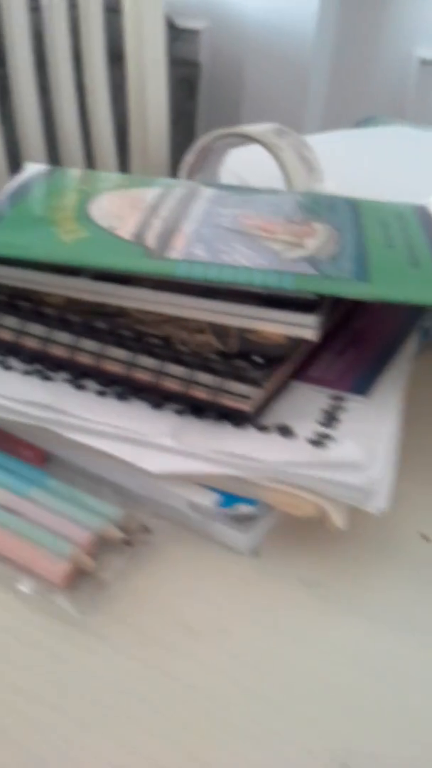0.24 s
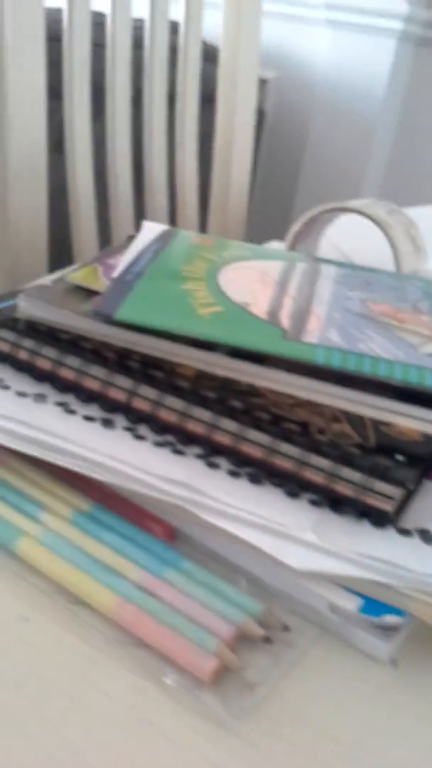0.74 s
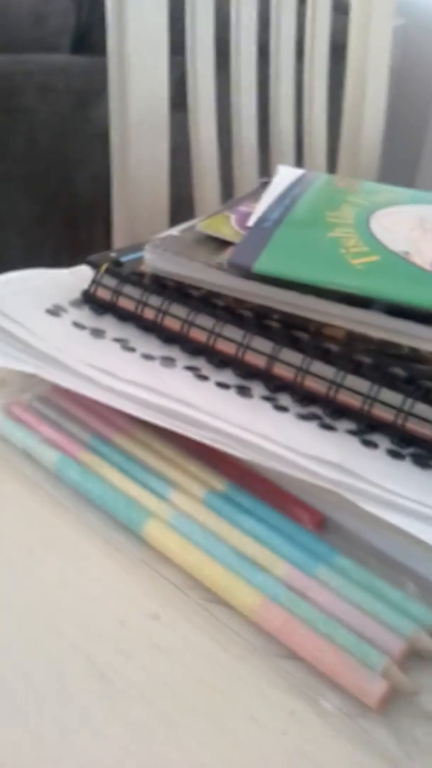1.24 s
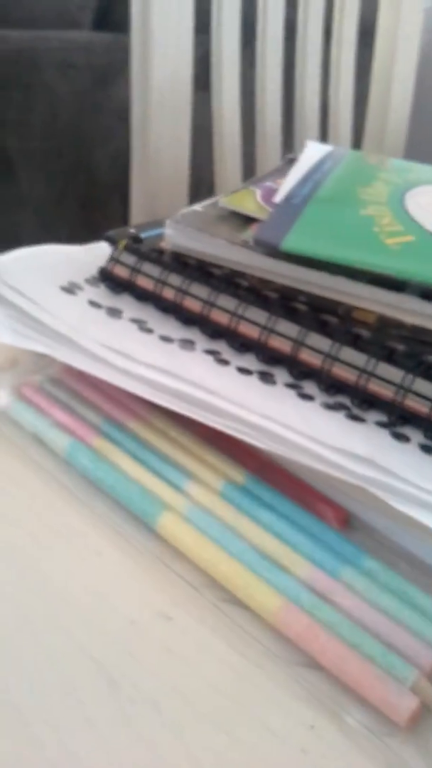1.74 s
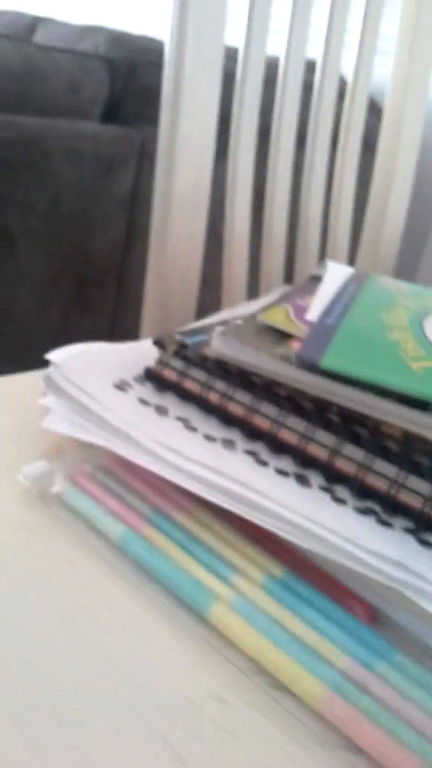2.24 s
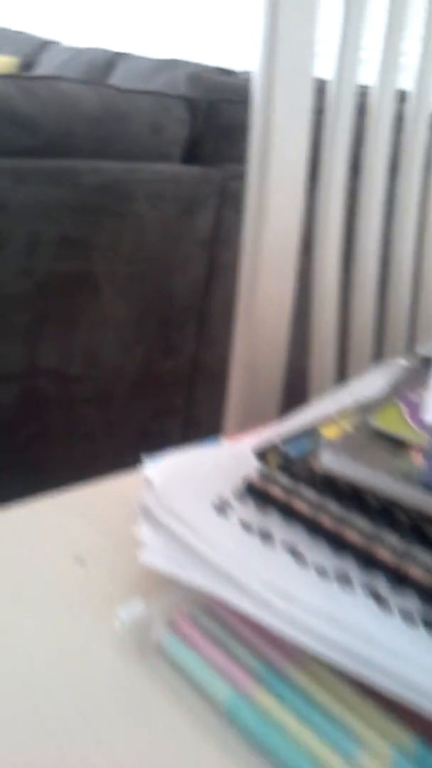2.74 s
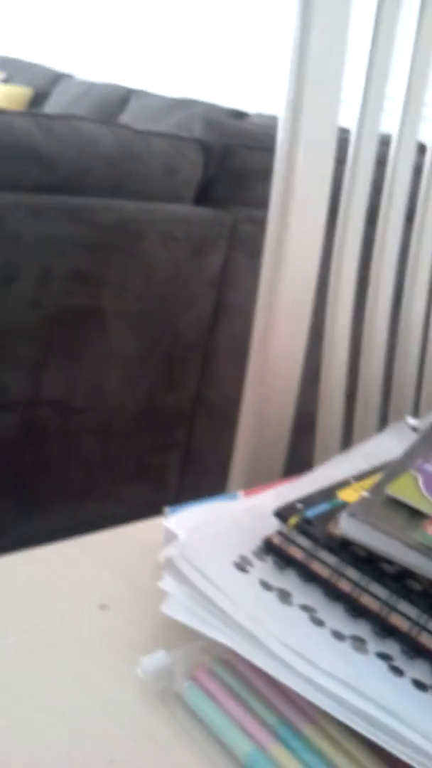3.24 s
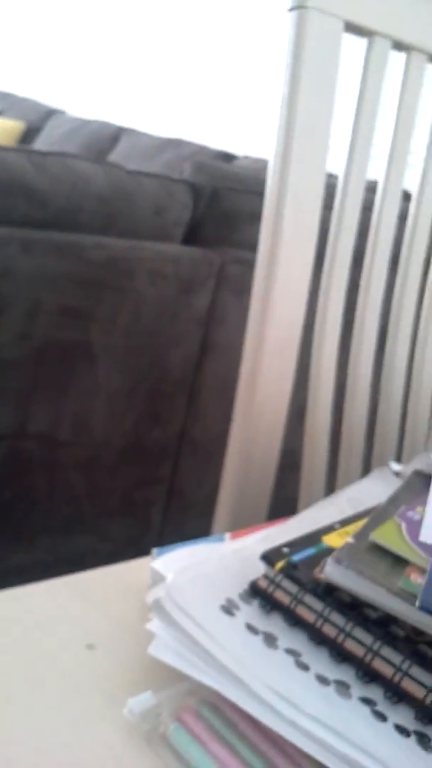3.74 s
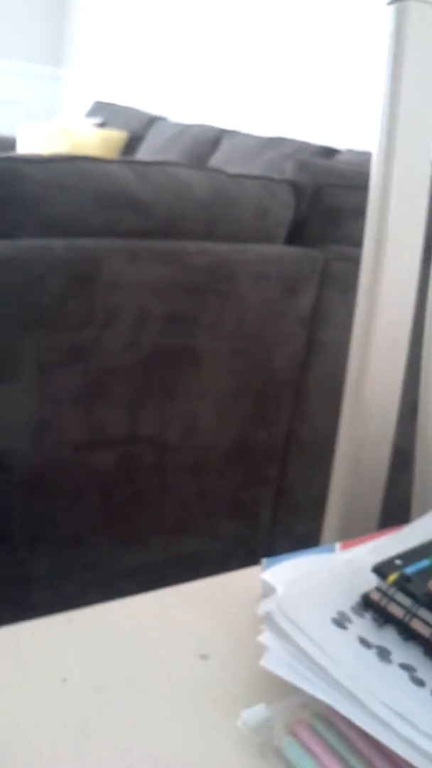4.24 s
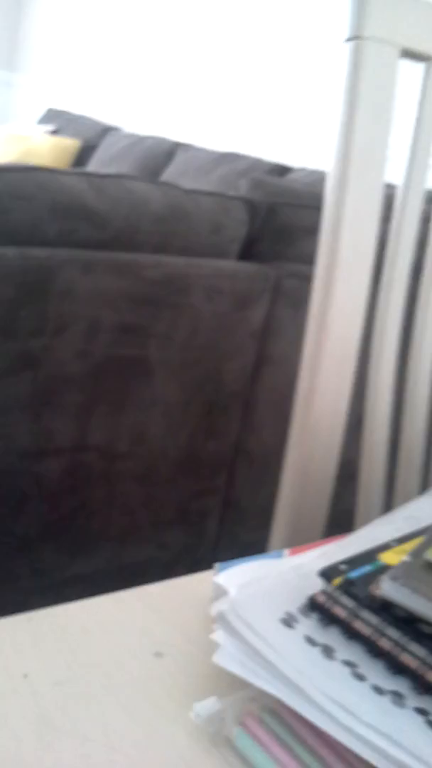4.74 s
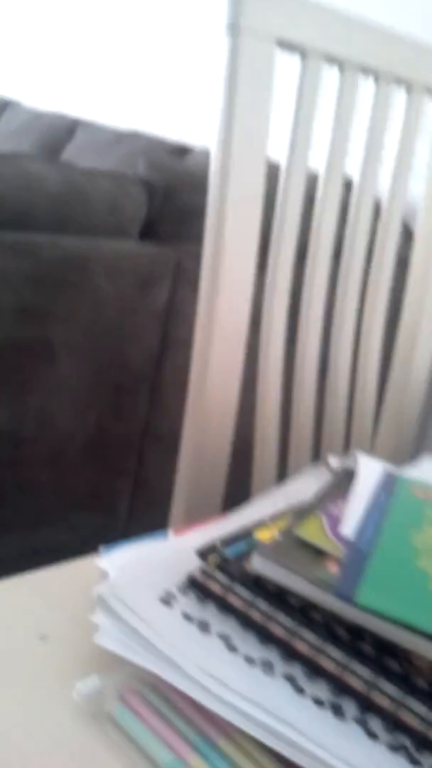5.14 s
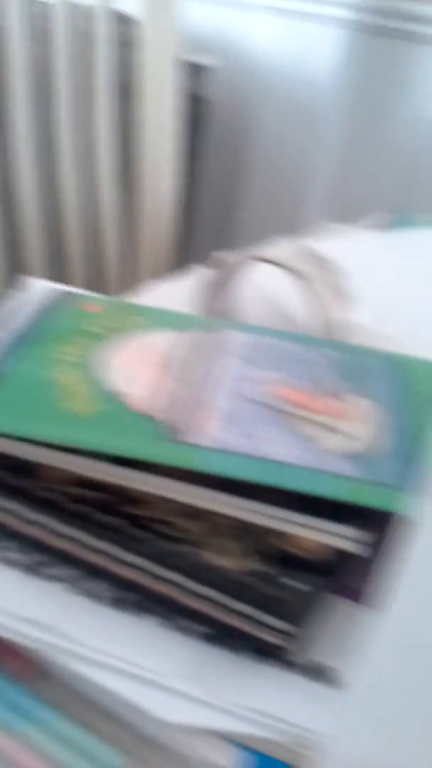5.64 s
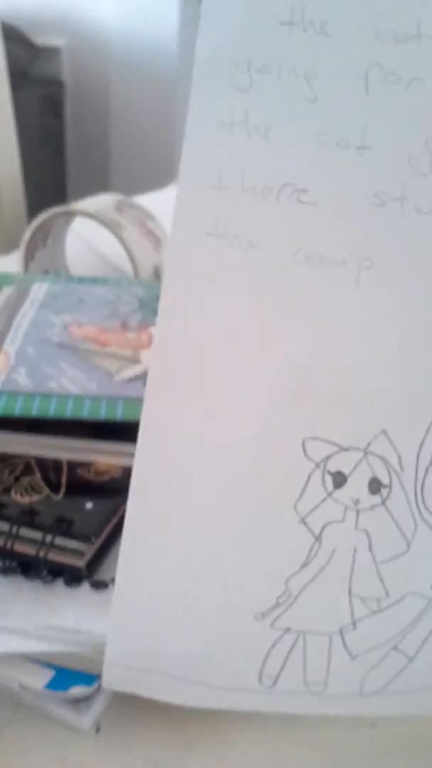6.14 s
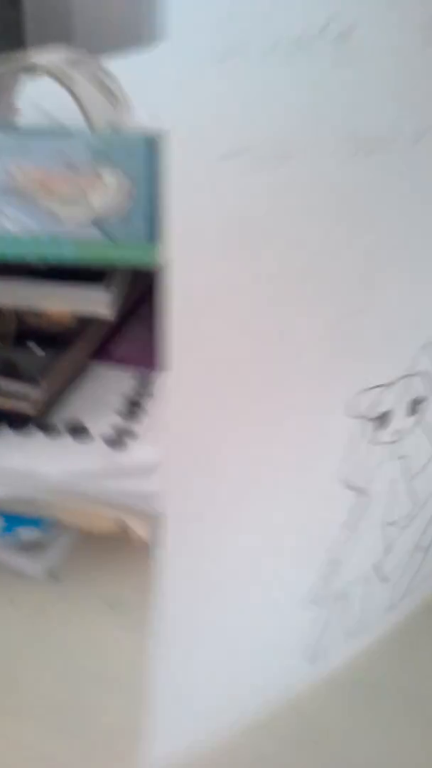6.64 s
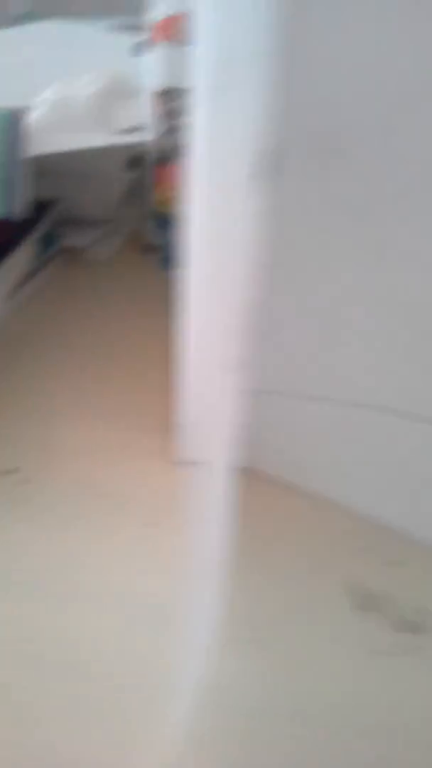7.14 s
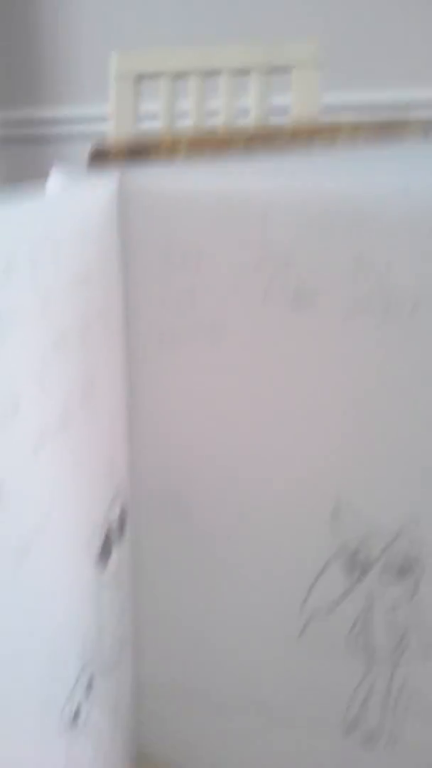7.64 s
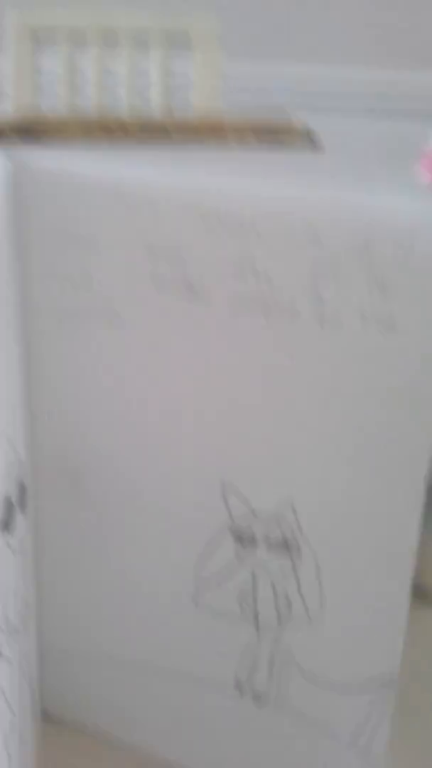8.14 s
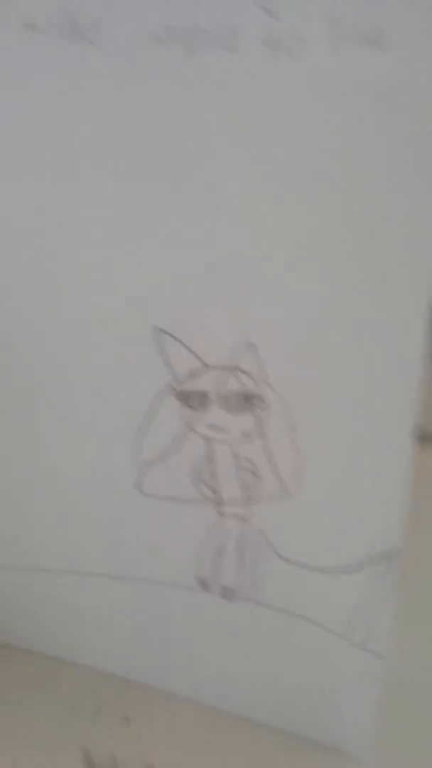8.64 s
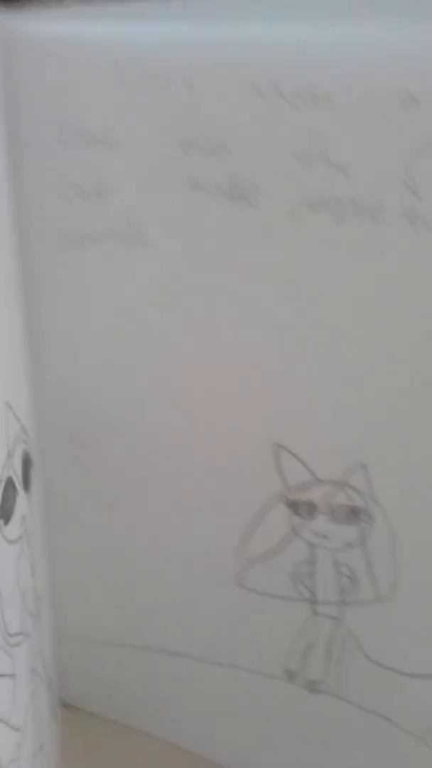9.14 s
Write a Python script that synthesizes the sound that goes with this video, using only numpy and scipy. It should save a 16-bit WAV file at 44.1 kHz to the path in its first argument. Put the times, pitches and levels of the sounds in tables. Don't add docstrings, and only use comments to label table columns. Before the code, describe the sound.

A quiet small room with low rumble and faint hiss, recorded very close on a phone in stereo. A sheet is already sliding at 0 s and fades; soft edge knocks come from 0.3 to 1.1, with a crisp rub and crease snaps near 0.9. At 1.7 a stiff corner cracks sharply on the left over a thump. A pad drops at 2.7, bouncing within a tenth of a second, followed by three tiny flaps and a brief faint squeak at 3.1. Light creases tick until 4.5, then a hollow rub with knocks to 4.8, taps at 4.9, a flat slap at 5.2, and a strong rustle at 5.5. A very faint creak at 5.7, a knock and rustle at 6.3, then flutter. Small ticks at 7; bright swishes from 7.7 to 8.1; dense, loud crumpling at 8.2-8.4. Quiet rustles and a firm low tap close around 9.1-9.2.

```python
import sys
import numpy as np
from scipy import signal
from scipy.fft import rfft, irfft, next_fast_len
from scipy.io import wavfile
from scipy.ndimage import uniform_filter1d, map_coordinates

SR = 44100
rng = np.random.default_rng(int(sys.argv[2]) if len(sys.argv) > 2 else 0)


def magnitude_from_level(level_db):
    exponent = np.asarray(level_db, float) / 20
    return 10 ** exponent


def log_audio(samples):
    frames = np.atleast_2d(samples).T
    limited = np.clip(frames, -1, 1)
    pcm = np.round(limited * 32767).astype(np.int16)
    wavfile.write(sys.argv[1], SR, pcm)


N = 414540


def unit(x):
    return x / np.sqrt(np.mean(x ** 2) + 1e-20)


def along(points, hz):
    f, v = np.transpose(points)
    return np.interp(np.log(hz + 1), np.log(f + 1), v)


def curves(rows):
    s, *columns = np.transpose(rows)
    return [np.interp(np.arange(N) / SR, s, column) for column in columns]


def wobble(rate):
    knots = rng.standard_normal(int(N * rate / SR) + 4)
    return map_coordinates(knots, [np.arange(N) * rate / SR])


def filtered(x, response):
    m = next_fast_len(N + SR // 2)
    return irfft(rfft(x, m) * response(np.fft.rfftfreq(m, 1 / SR)), m)[..., :N]


def resonances(modes):
    def response(f):
        total = 0
        for k, (centre, width, db) in enumerate(modes):
            ring = 1j * f * width / (centre * centre - f * f + 1j * f * width)
            total = total + (-1) ** k * magnitude_from_level(db) * ring
        return total
    return response


def coloured(spectrum):
    return lambda hz: magnitude_from_level(along(spectrum, hz))


def sides(db):
    return magnitude_from_level(np.array([db / 2, -db / 2]))


def blend(pair, alike):
    def mix(hz):
        turn = np.arccos(np.clip(along(alike, hz), -1, 1)) / 2
        return np.array([np.cos(turn), np.sin(turn)])
    mid, side = filtered(pair, mix)
    return np.array([mid + side, mid - side])


def grain(rough_db, rate, patchy_db, crackle=0):
    z = signal.stft(rng.standard_normal((2, N)), nperseg=256)[2]
    field = uniform_filter1d(rng.standard_normal(z.shape[1:]), 5, 0)
    field = uniform_filter1d(field, 10, 1)
    pair = signal.istft(z * magnitude_from_level(patchy_db * unit(field)), nperseg=256)[1][:, :N]
    pop_sizes = (rng.random(N) < 250 / SR) * rng.uniform(.5, 1, N)
    pops = pop_sizes * rng.standard_normal((2, N))
    return pair * magnitude_from_level(rough_db * wobble(rate)) + crackle * pops


def bursts(rows, alike, spread, top_hz, order, boost_db, size=SR // 32):
    out, t = np.zeros((2, N + SR)), np.arange(size) / SR
    for s, db, pan_db, t60, hz in rows:
        a, b = rng.standard_normal((2, len(t)))
        shape = magnitude_from_level(-60 * t / max(t60, .001)) * (1 - np.exp(-t / 0.00024))
        edges = [hz / spread, min(hz * spread, top_hz)]
        ports = shape * [a, alike * a + np.sqrt(1 - alike ** 2) * b]
        pair = signal.lfilter(*signal.butter(order, edges, "band", fs=SR), ports)
        energy = np.linalg.norm(shape) * np.sqrt((edges[1] - edges[0]) / hz)
        gain = magnitude_from_level(db + boost_db) * energy * sides(pan_db)
        out[:, round(s * SR):][:, :len(t)] += (gain / np.linalg.norm(pair, axis=1))[:, None] * pair
    return out[:, :N]


def soft_edged(x):
    return signal.sosfilt(signal.butter(6, 6800, fs=SR, output="sos"), x)


# (time [s], level [dB])
HUM = [(0.0, -61), (1.65, -55.5), (2.17, -63.5), (3.03, -58), (3.61, -61), (4.92, -58), (7.59, -61.5),
       (8.22, -56), (9.4, -63.5)]
# (frequency [Hz], width [Hz], level [dB])
ROOM_MODES = [(138, 14, -5), (212, 13, -1), (285, 45, -6), (337, 10, 2), (405, 40, -8), (480, 70, -15)]
# (frequency [Hz], level [dB per Hz])
HISS = [(260, -21), (450, -3.5), (543, -6.5), (812, -9), (1020, -10), (3730, -19), (6260, -19),
        (14000, -23)]
# (frequency [Hz], likeness [-1 to 1])
ALIKE = [(60, 0.3955), (180, 1), (550, 0.5), (1650, -0.31), (4970, 0.3), (15000, -0.087)]


def room():
    (db,) = curves(HUM)
    push = blend(rng.standard_normal((2, N)) * magnitude_from_level(1.54 * wobble(11)), ALIKE)
    modes = resonances(ROOM_MODES)
    rumble = filtered(push, lambda f: (modes(f) + 0.16) / (1 + (95 / (f + 1)) ** 5.9) / (1 + (f / 600) ** 4))
    shake = filtered(rng.standard_normal((2, N)), lambda f: 1 / (1 + (f / 24) ** 3))
    hiss = filtered(blend(rng.standard_normal((2, N)), ALIKE), coloured(HISS))
    return magnitude_from_level(db + 1.0) * (unit(rumble) + magnitude_from_level(-17.0) * unit(shake)) + magnitude_from_level(-64.5) * unit(hiss)


# (peak time [s], 20 dB rise [s], 20 dB fall [s], rub level [dB], drag over rub [dB])
PUSHES = [(0.01, -3, 0.7544, -59, -1), (0.72, 0.38, 0.3885, -52, -4.5), (0.912, 0.01, 0.06, -44, -4),
          (0.932, 0.04, 0.25, -44.5, -5), (2.3, 1, 0, -65, -11), (2.705, 0.01, 0.25, -51.5, 13),
          (3.126, .012, 0.18, -50, 0.5), (3.36, 0.94, 0.1, -61, -5), (3.47, .09, .14, -58, -8),
          (3.62, .1, .08, -57.5, -10), (3.775, .03, .07, -60.5, -8), (5.27, 0.3, 0.24, -56.5, -6),
          (5.499, 0.17, 0.14, -39.5, -4), (5.56, 0.46, 0.18, -60, 9.5), (5.86, 0, 0.5, -63, 0.5),
          (5.96, 0.08, 0.0593, -53.5, -4), (6.283, 0.02, -0.01, -46.5, 0), (6.91, 0.03, 0.15, -60.5, 2),
          (3.875, 0.3, 0.5, -63, -2), (7.37, 0.16, 0, -61, -12), (8.379, .07, .006, -37, -20),
          (9.055, .1, .05, -61, -2), (9.11, .05, .15, -64, 1), (9.157, .04, .05, -63, -5),
          (9.207, .05, .04, -55, 0), (9.28, .08, .03, -66, 0), (6.44, 0.13, .08, -59, 0.5),
          (6.27, 0.1, .05, -57, 0), (4.6, .1, -0.2, -52.5, -8), (7.83, 0.03, 0.15, -48.5, -30)]
# (start time [s], length [s], rub level [dB], gain by the end [dB], drag over rub [dB])
GLIDES = [(0.879, 0.013, -45, -1, -8), (1.056, 0.11, -62, 2, -4), (1.221, 0.421, -60, 10, -4.5),
          (1.688, 0.21, -58.5, 3.5, -3.5), (2.772, 0.16, -53, -4, 4), (4.016, 0.016, -51, 0, -4),
          (4.054, 0.11, -60, 4.5, 0), (4.193, 0.35, -62, 6.5, -1.5), (4.605, .15, -43.5, 5.5, -7),
          (4.766, 0.18, -45.5, -8, -2.5), (4.952, 0.17, -58.5, -6.5, -1), (6.302, 0.021, -45.5, 0.5, -8),
          (6.328, .05, -51.5, -3.5, -6), (7.681, 0.083, -42, -3, -23), (7.77, 0.088, -54.5, 1.5, -7.5),
          (7.834, 0.068, -42, 6.5, -31), (7.911, 0.044, -35.5, 5, -43), (7.953, 0.027, -32.5, -1.5, -29),
          (8.041, .01, -50, 4, -18), (8.053, 0.068, -38.5, 1, -23.5), (8.159, 0.07, -60.5, 9.5, -8.5),
          (8.218, 0.079, -47, 5, -15), (8.318, 0.03, -37.5, -4.5, -17), (8.397, 0.1, -51.5, -5.5, -4)]


def strokes():
    grip_s, stop_s = 0.0085, 0.022
    resting_db, resting_drag_db = -71.5, -73
    t = np.arange(0, N, 64) / SR
    shapes = []
    for s, rise, fall, db, over_db in PUSHES:
        away = np.maximum((s - t) / abs(rise), (t - s) / abs(fall))
        shapes.append((db - 20 * away, over_db))
    for s, length, db, gain_db, over_db in GLIDES:
        ends = np.maximum(np.maximum((s - t) / grip_s, (t - s - length) / stop_s), 0)
        shapes.append((db + gain_db * np.clip((t - s) / length, 0, 1) - 20 * ends, over_db))
    still_db = -6 * (t > 9.23)
    rub_power = magnitude_from_level(2 * (resting_db + still_db)) + sum(magnitude_from_level(2 * db) for db, _ in shapes)
    drag_power = magnitude_from_level(2 * resting_drag_db) + sum(magnitude_from_level(2 * (db + over_db)) for db, over_db in shapes)
    rub_db, drag_db = 10 * np.log10(rub_power), 10 * np.log10(drag_power)
    sheen_db = -9 - 0.13 * (rub_db + 60)
    sheen_db = sheen_db + 2 * (t > 7.66)
    sheen_db = sheen_db + 3 * np.exp(-((t - 7.95) / 0.036) ** 2)
    return curves(np.transpose([t, rub_db, drag_db, sheen_db]))


# (frequency [Hz], level [dB per Hz])
RUB = [(880, -57), (1500, -30.5), (2280, -14.5), (2900, -13.5), (3700, -10.5), (5660, 0), (8020, -6),
       (9500, -13.5), (12400, -38), (20900, -120)]
# (frequency [Hz], level [dB per Hz])
DRAG = [(150, -13.5), (350, -0.5), (700, -3.5), (1100, -7.5), (1800, -5), (2600, -9), (4000, -10.5),
        (7000, -37)]
# (time [s], level over rub [dB])
EDGE = [(7.66, 12), (7.8, 4), (7.9, 7), (7.96, 3), (7.99, -1), (8.06, -0.5), (8.12, 3), (8.16, -33)]
# (time [s], left-right difference [dB])
SWING = [
    [(0.0, 0), (1.82, -0.5), (2.45, -0.5), (2.6, 7)],
    [(2.6, 1.5), (3.16, 0), (4.06, 2.5), (4.65, 0), (7.14, -1), (7.6, -6.5)],
    [(7.6, -4.5), (8.176, 11.5), (8.6, 7.5)],
    [(8.6, 6), (9.28, -0.5), (9.4, -3)],
]


def slides():
    rub_db, drag_db, sheen_db = strokes()
    (edge_db,) = curves([(EDGE[0][0] - .01, -60), *EDGE])
    edge_ring = resonances([(7500, 2300, 0)])
    sheen_colour = coloured([(7000, -45.0), (9500, -2.0), (14000, -3.0), (16000, -22)])
    rub = unit(filtered(grain(rough_db=1.0, rate=140, patchy_db=2.5, crackle=6.0), coloured(RUB)))
    edge = unit(filtered(grain(rough_db=0.5, rate=140, patchy_db=0.5), lambda f: edge_ring(f) ** 2))
    sheen = unit(filtered(grain(rough_db=0.5, rate=460, patchy_db=0.2, crackle=4.315), sheen_colour))
    pile = blend(grain(rough_db=1.0, rate=200, patchy_db=2.5, crackle=9.5), ALIKE)
    drag = unit(filtered(pile, coloured(DRAG)))
    fine = (rub + magnitude_from_level(edge_db) * edge) / np.sqrt(1 + magnitude_from_level(2 * edge_db)) + magnitude_from_level(sheen_db) * sheen
    pan = sides(curves(np.vstack(SWING))[0])
    return pan * (magnitude_from_level(rub_db - 0.84) * fine + magnitude_from_level(drag_db - 2.0) * drag)


# (time [s], peak level [dB], left-right difference [dB], 60 dB decay [s], centre [Hz])
THUMPS = [(0.044, -50.5, 0.012, 0.16, 260), (1.378, -42.5, 0, 0.073, 325), (1.62, -38, 0, 0.048, 266),
          (1.716, -30.5, 0, 0.034, 300), (2.695, -33, 0, 0.1, 428), (2.767, -37, 0, 0.12166, 430),
          (3.124, -32.5, 0, 0.025, 298), (4.089, -41.5, 0, 0.044, 342), (4.096, -42, 0, 0.016, 450),
          (5.195, -44, 0, 0.16, 530), (5.523, -44, 0, 0.34, 240), (5.554, -44, 0, 0.21, 323),
          (6.273, -33.5, 0, 0.032, 367), (6.32, -41.5, 0, 0.044, 474), (9.084, -45, 0, 0.1, 386),
          (9.096, -42.5, 0, 0.15, 410), (5.196, -48, 0, 0.08, 190), (1.716, -45.5, 0, .06, 100),
          (8.38, -54, 0, .2, 111)]


def thumps():
    return bursts(THUMPS, alike=0.96, spread=1.534, top_hz=2000, order=2, boost_db=0.5, size=SR // 8)


# (time [s], peak level [dB], left-right
# difference [dB], 60 dB decay [s], centre [Hz])
KNOCKS = [
    (0.279, -40, -4, 0.047, 1130),
    (0.554, -35.5, 5.5, 0.15, 1120),
    (0.735, -38, -1, 0.065, 710),
    (0.81, -31, -2, 0.021, 855),
    (1.074, -42, -2, 0.086, 770),
    (1.379, -37, -1, 0.075, 900),
    (1.62, -33.5, 5, 0.12, 640),
          (3.116, -47, -11, 0.0229, 622.5), (3.766, -43, 4, 0.038, 524), (4.098, -63, 3, 0.031, 596),
         (4.62, -36.5, -2, 0.097, 1600), (4.719, -34.5, -4, 0.16, 1470), (4.741, -33.5, 14, 0.083, 568.7),
         (4.758, -25, -2, 0.015, 1500), (4.785, -32, -2, 0.02819, 1690), (5.34, -38, -1, 0.025, 620),
         (5.38, -36, 5, 0.065, 517), (5.947, -41, 2, 0.028, 915), (6.275, -23.5, 5, 0.011, 540),
         (6.828, -41, -4, 0.042, 558), (9.108, -39.5, 1, 0.044, 610),
          (5.197, -27.5, 1, 0.045, 2160),
          (4.894, -37, 7.5, 0.2, 480),
    (4.897, -30.5, -4, 0.024, 1780),
    (9.0955, -34.5, -4, 0.033, 800),
    (9.192, -24.5, 0, 0.034, 656),
    (9.193, -33, -9, 0.024, 1680),
]


def knocks():
    rows = KNOCKS
    thud = bursts(rows, alike=0.2, spread=1.746, top_hz=8000, order=2, boost_db=-8.0, size=SR // 8)
    return soft_edged(thud)


# (frequency [Hz], 60 dB decay [s])
WALLS = [(200, 0.5), (1500, 0.12), (6000, 0.0078)]


def walls(x):
    hz, t, z = signal.stft(rng.standard_normal((2, SR // 2)), SR, nperseg=256)
    tail = signal.istft(z * magnitude_from_level(-60 * t / along(WALLS, hz)[:, None]), SR, nperseg=256)[1]
    late = np.pad(x, ((0, 0), (150, 0)))
    return signal.fftconvolve(late, tail / np.linalg.norm(tail[0]), axes=1)[:, :N]


def creases(rows, t60, hz=None):
    return [(s, db + (share_db if hz else 0), pan_db, t60, hz or own_hz)
            for s, db, pan_db, own_hz, share_db in rows]


def snapping(rows):
    t60, body_hz = 0.0071, 2190
    tick = bursts(creases(rows, t60), alike=0.18, spread=1.114, top_hz=16000, order=1, boost_db=0.1)
    body = bursts(creases(rows, t60, body_hz), alike=0.34, spread=1.8, top_hz=16000, order=1, boost_db=-1)
    return tick + body


# (time [s], peak level [dB], left-right difference [dB], centre [Hz], shake of the sheet [dB])
SNAPS = [(0.555, -26, 2, 3865, -32), (0.8755, -30, 6, 6500, -17), (0.879, -31, 4, 5800, -19),
         (0.8835, -31.5, -4, 6600, -6.5), (0.908, -28, 0, 3400, -20), (0.941, -24.5, 3.5, 5260, -28),
         (1.5, -34, -2.5, 6370, -15), (1.7178, -36, 16, 5530, -17), (2.692, -17, 8, 5770, -38),
         (2.7715, -23, -7, 3310, -17.5), (2.921, -44, -2, 5500, -8), (3.126, -27, 4, 5924, -10),
         (3.453, -40, 0, 5500, -25), (3.464, -28.5, 6, 4970, -38), (3.679, -41, 0, 6360, -25),
         (3.905, -50, 0, 5500, -25), (4.005, -43, -2, 4020, -5), (4.0158, -32, 13, 5890, -14),
         (4.033, -30.5, 11, 6040, -18), (4.1467, -30, 14, 5100, -15), (4.362, -36, 1.5, 5700, -11),
         (4.4261, -25, 5.5, 5400, -7), (4.4914, -28.5, 4, 6800, -27), (4.6046, -27, -8.5, 7100, -18.5),
         (4.851, -38.5, 5, 7000, -20), (5.022, -25, -3, 4560, -21), (5.398, -37, -2, 5500, 0),
         (5.48, -22, -6, 6000, -14), (5.498, -20.5, -4, 6010, -20), (5.9943, -39, 1.5, 6140, -20),
         (6.275, -26, 11.5, 5150, -7.5), (6.685, -42, -2.5, 4070, -23), (6.814, -42.5, -5, 5900, -14),
         (6.83, -41, 0.5, 5300, -13), (6.857, -44, 0, 6400, -10), (6.887, -42, -2, 6800, -9),
         (7.674, -29, -6, 4620, -14), (8.0518, -34, 17, 5160, -12)]


def snaps():
    return snapping(SNAPS)


# (time [s], peak level [dB], left-right difference [dB])
CRACK = [
    (1.71472, -17, 14),
    (1.7152, -6, 17),
    (1.71613, -12, 17),
    (1.7196, -24, 8),
    (1.7446, -33, 8),
    (1.7467, -21, 10),
]
# (frequency [Hz], width [Hz], level [dB])
CORNER = [(480, 400, -5), (1100, 1030, 4.5), (4930, 1800, 5.5), (8400, 4500, -1.5)]


def cracks():
    blows = np.zeros((2, N))
    for s, db, pan_db in CRACK:
        blows[:, round(s * SR)] = magnitude_from_level(db - pan_db / 2) * sides(pan_db)
    return magnitude_from_level(9.0) * filtered(blows, resonances(CORNER))


# (time [s], peak level [dB], left-right difference [dB], 60 dB decay [s], centre [Hz])
DROP = [(2.69, -13, 6.5, 0.026, 2000), (2.704, -19, 13, 0.06, 1640), (2.702, -18.5, -10, 0.026, 2120),
        (2.711, -31, 3, 0.05, 1940), (2.738, -28.5, 2, 0.049, 1460), (2.749, -29, -4, 0.036, 1470),
        (2.768, -13.5, 6.5, 0.027, 2400), (2.7705, -17.5, -2, 0.019, 3000), (2.743, -28, 0, .04, 1300),
        (2.755, -31, 0, .04, 1200), (2.779, -27, -4, 0.017, 1920)]
# (frequency [Hz], width [Hz], level [dB])
PAD = [(706, 120, -0.5), (1440, 100, -3), (1954, 39, 1.5), (2320, 160, -4), (3000, 120, -7),
       (3400, 180, -9)]


def pad_drop():
    hits = bursts(DROP, alike=0.25, spread=2.12, top_hz=8000, order=2, boost_db=-10.5, size=SR // 8)
    boards = lambda f: 1 + magnitude_from_level(6) * sum(resonances([mode])(f) for mode in PAD)
    return soft_edged(filtered(hits, boards))


# (time [s], peak level [dB], left-right difference [dB], centre [Hz], shake of the sheet [dB])
FLUTTER = [
    (5.341, -40.5, 0, 5000, -9),
    (5.547, -28, -1, 6500, -6.5),
    (5.553, -34, 0, 7500, -15),
    (6.252, -40, 2, 5500, -8),
    (6.418, -37, 0, 6000, -18),
    (6.427, -39, 0, 6500, -18),
    (6.438, -36, 2, 5500, -7),
    (6.45, -39, 0, 5500, -15),
    (6.468, -45, 0, 6000, -15),
]


def flaps():
    start_s, gap_s = 2.8117, .0405
    corner = [(start_s + k * gap_s, -28.5, 0, 5400, -17) for k in range(3)]
    return snapping(corner + FLUTTER)


# (frequency [Hz], width [Hz], start time [s], level [dB], 60 dB decay [s])
SQUEAK = [
    (5500, 400, 3.125, -47, .3),
    (6150, 330, 3.125, -48, .8),
    (7200, 330, 3.14, -52, .9),
]


def squeak():
    t, out = np.arange(N) / SR, 0
    noise = rng.standard_normal((2, N))
    for hz, width, start, db, t60 in SQUEAK:
        ring = resonances([(hz, width, 0)])
        band = unit(filtered(noise, lambda f: ring(f) ** 2)) * magnitude_from_level(3 * wobble(35))
        skidding = (t > start) & (t < 3.305)
        out = out + magnitude_from_level(db - 60 * np.clip(t - start, 0, 1) / t60) * skidding * band
    return out


# (time [s], level [dB])
HOLLOW = [(4.54, -72), (4.56, -62), (4.6, -61), (4.66, -50), (4.73, -44), (4.79, -52), (4.85, -64),
          (4.9, -85)]


def hollow():
    (db,) = curves([(HOLLOW[0][0] - .01, -130), *HOLLOW, (HOLLOW[-1][0] + .01, -130)])
    pocket = resonances([(1810, 760, 0)])
    rubbing = grain(rough_db=4.0, rate=90, patchy_db=3.0, crackle=5)
    return magnitude_from_level(db) * unit(filtered(rubbing, lambda f: pocket(f) ** 2))


# (time [s], level [dB], pitch [Hz])
CREAK = [(5.61, -70.5, 2090), (5.65, -69, 2030), (5.69, -72, 2100), (5.73, -63, 2070), (5.76, -69, 1980),
         (5.81, -72, 2040), (5.84, -90, 2000)]


def creak():
    db, hz = curves([(CREAK[0][0] - .01, -130, 2200), *CREAK, (CREAK[-1][0] + 0.011, -130, 2000)])
    phase = 2 * np.pi * np.cumsum(hz * (1 + 0.045 * wobble(150))) / SR
    return magnitude_from_level(db - 2.5 + 4 * wobble(70)) * (np.sin(phase) + 0.6 * np.sin(2 * phase))


# (time [s], peak level [dB], left-right difference [dB], centre [Hz], highest crackle [dB])
CRUMPLE = [(7.0255, -34, -1, 5800, -10.5), (7.025, -33.5, 3, 8200, -10), (7.046, -28, 1.5, 5760, -9),
           (7.0715, -46, 0, 5500, -8), (8.2258, -27.5, 5.5, 6000, -26), (8.232, -25, 5, 5140, -29),
           (8.236, -22, -3, 5450, -33), (8.2555, -25, 7, 5800, -24), (8.264, -26, 17, 5800, -22),
           (8.2654, -13.5, -2, 6000, -24), (8.2785, -23, -3, 7600, -20), (8.283, -19, -1, 6900, -22),
           (8.287, -23, -8, 7000, -18), (8.3057, -8, -4, 6100, -16), (8.3075, -13.5, 2, 5500, -14),
           (8.3185, -29, -3.5, 5200, -18), (8.326, -24, -7, 6000, -15), (8.333, -23, -11, 5400, -16),
           (8.3394, -19, -13, 6000, -13), (8.3445, -23, -2, 6300, -14), (8.359, -20, -7, 6010, -19),
           (8.364, -12, -2, 5904, -17), (8.367, -19, 4, 6000, -16), (8.3709, -12, -3, 6200, -9.5),
           (8.3744, -10, 8, 6100, -11.5), (8.3752, -12, 14, 5970, -15.5), (8.379, -10, -2, 6700, -4.5),
           (8.3808, -18, 3, 6373, -23), (8.4114, -36, 8, 5900, -16), (8.4443, -27, 7, 4430, -29),
           (8.4838, -39, 8, 5950, -7), (8.514, -35, 6, 6330, -8)]


def crumple():
    t60, body_hz, crisp_hz = 0.0044, 2190, 11600
    dull = [(s, db, pan_db, hz, 2 * -8.5 - 22.5 - crisp_db) for s, db, pan_db, hz, crisp_db in CRUMPLE]
    tick = bursts(creases(CRUMPLE, t60), alike=0.2, spread=1.163, top_hz=16000, order=2, boost_db=1.5)
    body = bursts(creases(dull, t60, body_hz), alike=0.17, spread=2.24, top_hz=16000, order=1, boost_db=-1)
    crisp = bursts(creases(CRUMPLE, t60, crisp_hz), alike=0.251, spread=1.4, top_hz=15700, order=1,
                   boost_db=2.0)
    return tick + body + crisp


# (frequency [Hz], left-right difference [dB])
PORTS = [(2500, 0), (5500, 4.5), (8000, -4), (12000, -4)]


def scene():
    thud = thumps() + knocks() + pad_drop()
    ticks = snaps() + cracks() + flaps() + crumple()
    paper = slides() + thud + walls(magnitude_from_level(-17.0) * thud) + ticks + squeak() + hollow() + creak()
    return filtered(paper, lambda hz: sides(along(PORTS, hz))) + room()


# (frequency [Hz], depth [dB])
STARVE = [(550, 60), (750, 30.5), (1400, 24), (3600, 19.5), (4500, 60), (8300, 57), (9600, 29.5),
          (15000, 34.5)]


def starved(x):
    hz, _, z = signal.stft(x, SR, nperseg=1024)
    power = uniform_filter1d(np.mean(np.abs(z) ** 2, 0), size=9, axis=0)
    power = uniform_filter1d(power, size=3, axis=1)
    level_db = 10 * np.log10(np.abs(power) + 1e-16)
    over_db = level_db[hz > 1000].max(0) - level_db - along(STARVE, hz)[:, None]
    loss_db = 7 * np.maximum(over_db, 0)
    return signal.istft(z * magnitude_from_level(-loss_db), SR, nperseg=1024)[1][:, :N]


def top_band(x):
    gate_db = -58
    top = magnitude_from_level(-17) * filtered(x, lambda hz: (hz >= 14550) & (hz < 16500))
    power = np.abs(uniform_filter1d(np.mean(top ** 2, 0), size=96)) ** 2
    return top * power / (power + magnitude_from_level(4.4 * gate_db))


def top_cut(x):
    return signal.sosfilt(signal.butter(12, 16510, fs=SR, output="sos"), x)


def record(dry):
    x = signal.sosfilt(signal.butter(1, 90, "high", fs=SR, output="sos"), dry)
    mix = starved(filtered(x, lambda hz: hz < 14550)) + top_band(x)
    return top_cut(mix)


dry = scene()
out = record(dry)
log_audio(out)
```